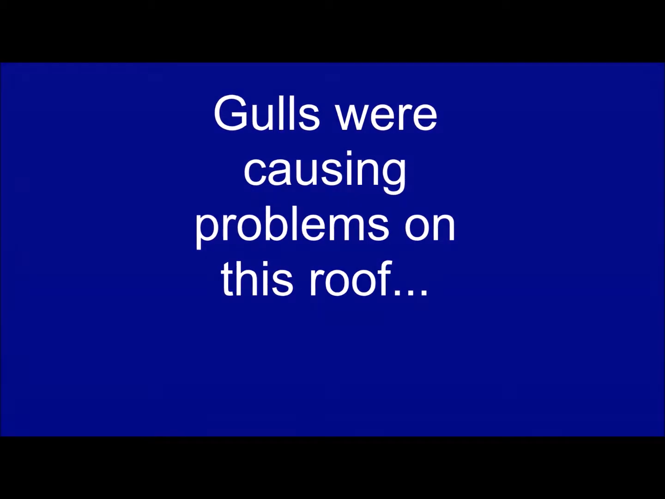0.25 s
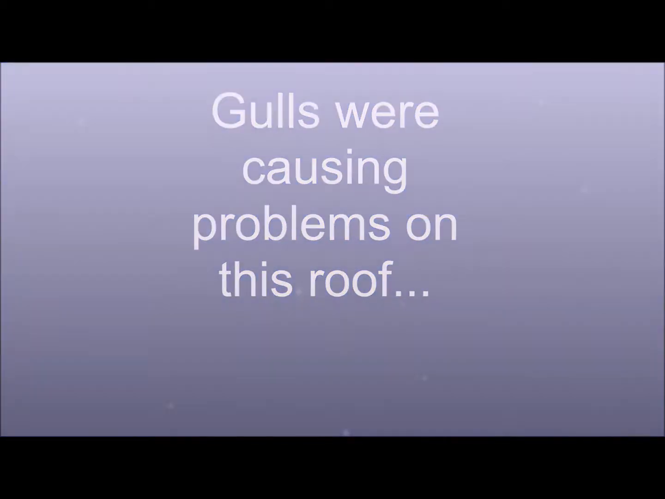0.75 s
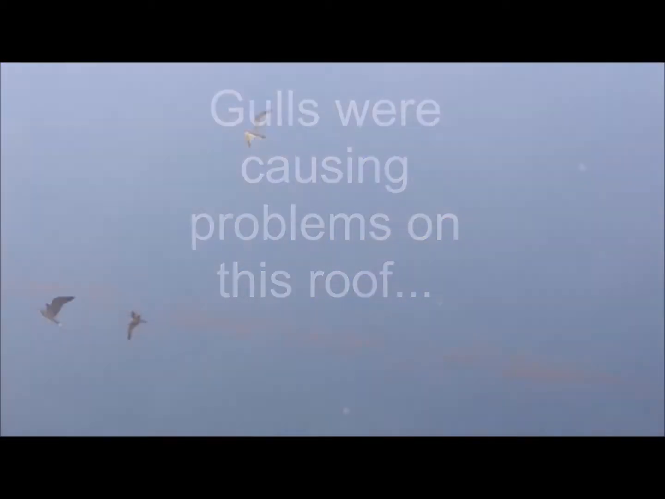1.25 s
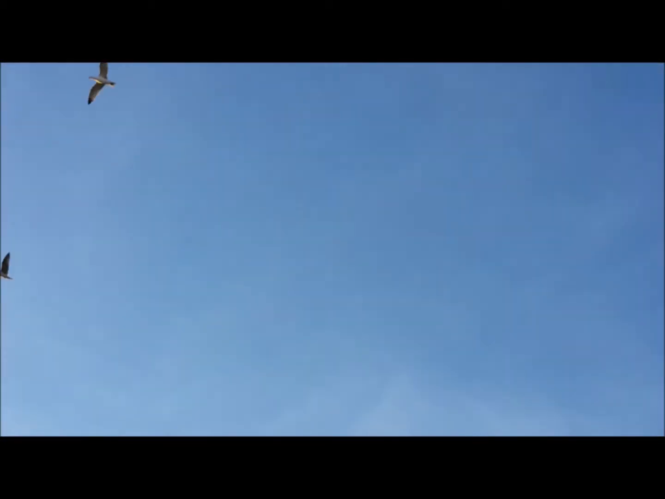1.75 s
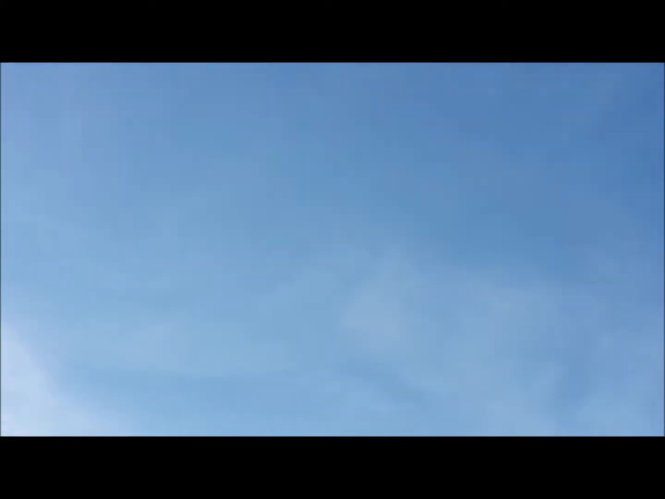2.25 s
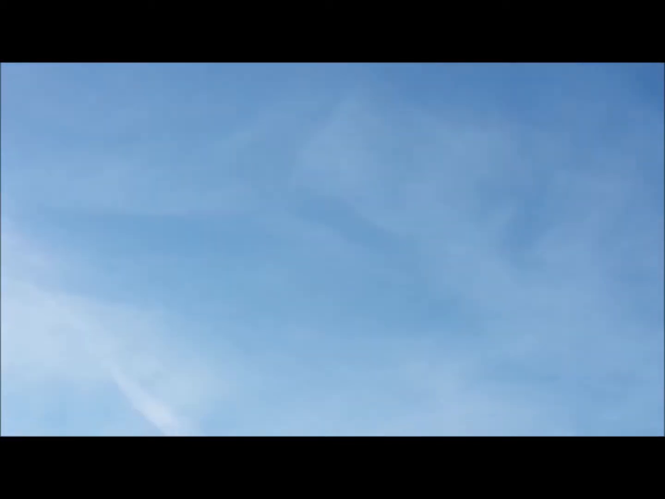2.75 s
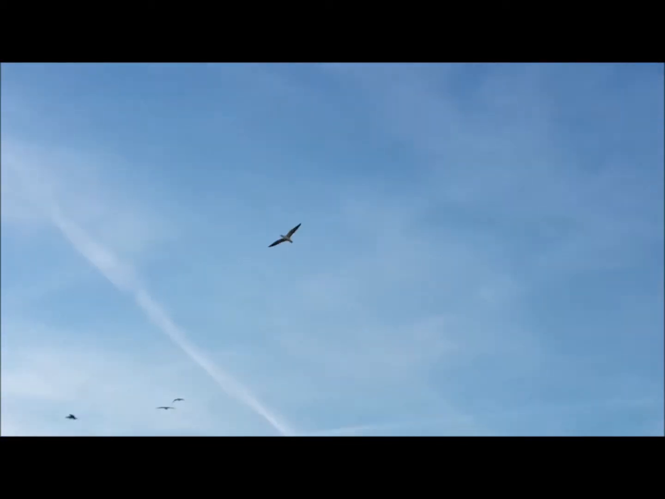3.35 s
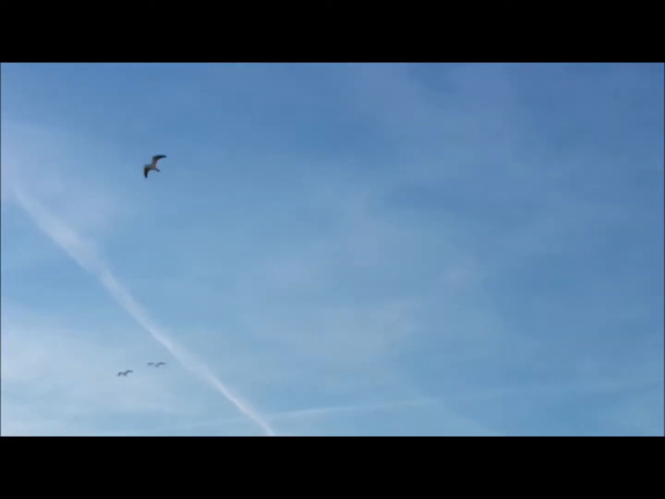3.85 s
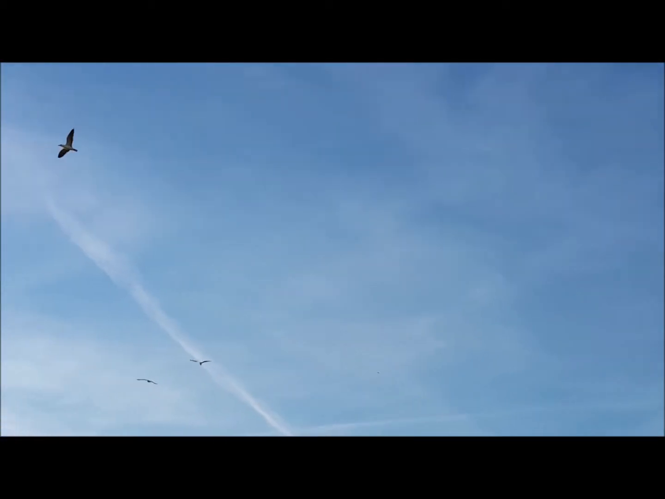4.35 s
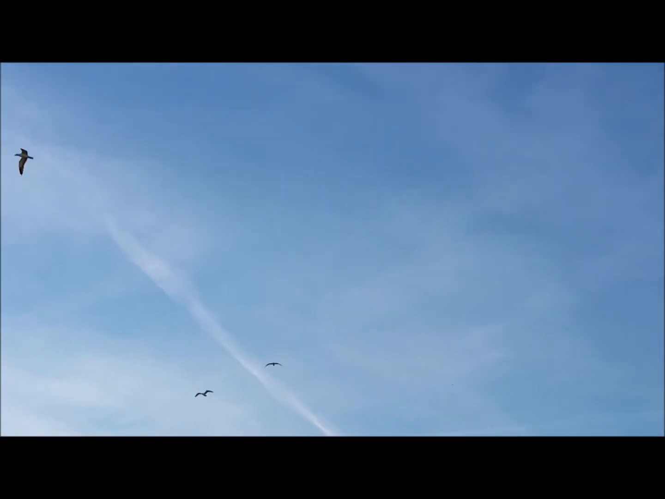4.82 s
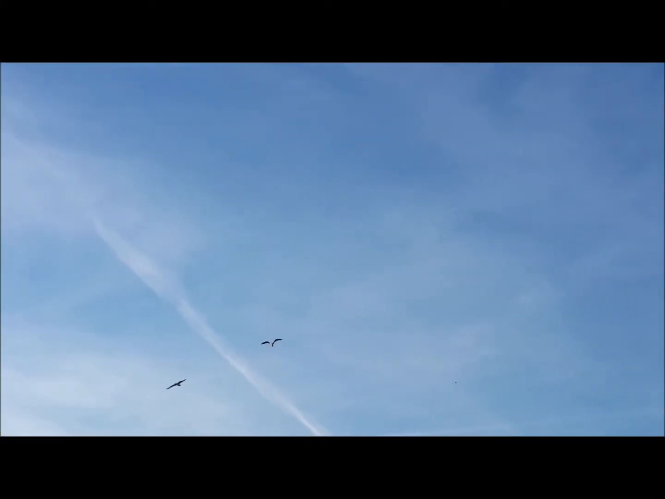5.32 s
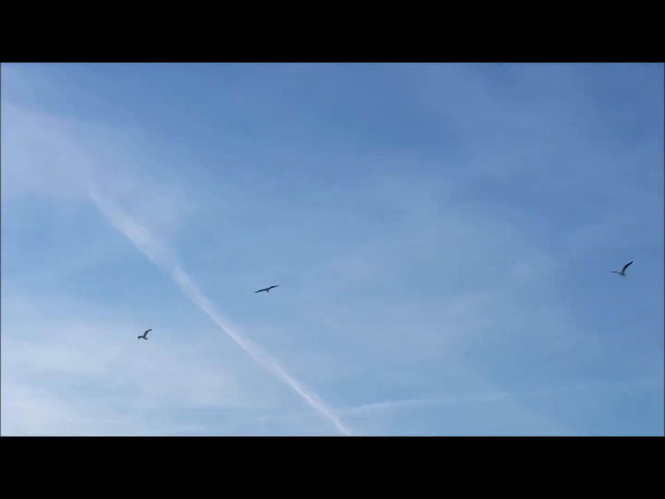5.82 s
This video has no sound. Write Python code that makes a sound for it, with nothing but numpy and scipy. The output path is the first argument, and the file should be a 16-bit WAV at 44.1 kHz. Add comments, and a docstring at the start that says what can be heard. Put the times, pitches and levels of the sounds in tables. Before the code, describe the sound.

Outdoors by a roof, a handheld stereo microphone picks up gulls at mixed distances. Their crowded, faint opening cries grow clearer as the sound fades in; then strong high mews and deep calls alternate and overlap, spaced more widely. Tiny falling whistles come from a small bird. Low wind buffets thud irregularly from just after three seconds, with dull town rumble and distant gull blur underneath.

```python
"""Out of silence a roofscape fades in: gulls cry across each other, high mews and lower long calls.
Each cry is a harmonic stack on a drawn pitch, shaped by a tone-colour curve; mews mostly reach the left first.
A small bird chips in falling whistles, and scattered echoes follow both kinds of bird.
Wind is lumpy low noise plus damped pressure swings at each microphone port.
Below lie town rumble, a drone, a far-off flock as shaped noise, hiss and a brief faint tone."""
import sys
import numpy as np
from scipy import signal
from scipy.fft import rfft, irfft
from scipy.io import wavfile
from scipy.ndimage import uniform_filter1d

SR = 44100
rng = np.random.default_rng(int(sys.argv[2]) if len(sys.argv) > 2 else 0)


def log_audio(samples):
    """Write samples as a 16-bit WAV file to the path given in sys.argv[1]."""
    # one column per channel
    frames = np.atleast_2d(samples).T
    # limit to full scale, then quantise
    limited = np.clip(frames, -1, 1)
    pcm = np.round(limited * 32767).astype(np.int16)
    wavfile.write(sys.argv[1], SR, pcm)


N = 268260

# All levels are ahead of the fade-in. Left-right is left over right in dB; lead is left before right.

# High mews: some break up from a lower lead-in, others start straight on the top note;
# then a hold, a drop to a shelf and a tail.
# Each row: top time, lead-in, hold and tail in seconds, lead-in, top, shelf and end pitch in Hz,
# lead-in, top, shelf and end effort in dB, left-right in dB, left lead in ms, overtones in dB,
# dulling in dB per kHz, odd overtones in dB.
MEWS = [(0.372, 0.0026, 0.02, 0.09, 1696, 1656, 1430, 1377, -49, -36.5, -40.5, -41.5, -2.5, 0.33, 7.5, 5, 0),
        (0.417, 0.0016, 0.058, 0.032, 1670, 1673, 1505, 1427, -48, -44, -37.5, -45, -2, 0.25, 8, 4.5, 2),
        (0.515, 0.0017, 0.037, 0.18, 1496, 1445, 1252, 1126, -49, -34, -42.5, -42, -3.5, 0.33, 0.5, 3.5, 5),
        (0.864, 0.002, 0.003, .003, 1680, 1710, 1590, 1580, -47, -45.5, -56, -63, 2, 0.36, 4.5, 0, -5),
        (0.92, 0.0023, 0.0014, 0.12, 1390, 1370, 1262, 1106, -40, -47, -48, -52.5, -6, -0.35, -1.5, 3, 3),
        (0.674, 0.029, 0.044, 0.16, 1258, 1794, 1552, 1373, -33, -32.5, -30, -40.5, 2, -0.23, -4, 0, 0),
        (1.33, 0.053, 0.022, 0.067, 1340, 1620, 1408, 1340, -40, -36, -42.5, -44.5, -4.5, 0.31, 11.5, 9, -3),
        (1.448, .025, 0.044, 0.15, 1289, 1420, 1253, 1050, -46, -34, -38.5, -49, -3.5, 0.36, 10.5, 7, -0.5),
        (1.47, 0.0015, 0.04, .01, 1400, 1410, 1305, 1280, -55, -58, -52, -49, -5, 0.34, 1.5, 3, 15.5),
        (1.48, 0.0024, 0.021, 0.15, 1738, 1714, 1570, 1497, -52, -52, -35.5, -43, -3, 0.32, -10, 1, 8),
        (1.548, 0.0022, .03, 0.035, 1700, 1710, 1600, 1600, -51, -46, -61, -59, -9, 0.37, 13, 5, -1),
        (1.596, 0.0027, 0.014, 0.022, 1793, 1800, 1673, 1600, -61, -55.5, -56, -60.5, -10, 0.38, 7.5, -0.5, -2.5),
        (1.889, 0.028, 0.045, 0.19, 1229, 1812, 1538, 1330, -31.5, -37, -36, -50, 4.5, 0.14, 10, 3.5, 7),
        (2.468, 0.039, 0.042, 0.14, 1375, 1660, 1430, 1263, -79, -48, -61, -66, -9.5, 0.37, 11, 4.5, 1),
        (2.55, 0.0015, .02, .04, 1640, 1645, 1480, 1400, -59, -61, -67, -71, -6, 0.44, 12, 7, -2),
        (2.511, 0.0024, 0.045, 0.0035, 1663, 1608, 1324, 1350, -64, -49, -40, -45, -2, 0.41, -14, 8, -4),
        (2.779, 0.022, .04, .19, 1310, 1727, 1508, 1304, -25, -35.5, -30.5, -48, -1, 0.241, -0.5, 1.5, 2.5),
        (3.449, 0.049, 0.02, 0.085, 1170, 1410, 1379, 1242, -37, -35.5, -38.5, -41, -7, 0.46, -17.5, 4.5, 7.5),
        (4.204, 0.097, 0.0022, 0.0013, 1494, 1736, 1660, 1720, -43, -45, -55, -67, -1.5, 0.37, -31, 7, -8),
        (4.243, 0.053, 0.0089, 0.016, 1247, 1420, 1412, 1376, -31.5, -33, -41, -43, -7, 0.47, -21, 9.5, -4),
        (4.554, 0.03, 0.017, 0.22, 1353, 1436, 1327, 1202, -60.5, -60, -50.5, -58.5, 0, 0.46, 0, 4.5, 5),
        (4.679, 0.016, 0.0074, 0.048, 1245, 1522, 1452, 1230, -54, -41, -45.5, -45, -6.5, 0.33, -14, 6, 6),
        (5.072, 0.037, 0.034, 0.0023, 1322, 1616, 1622, 1650, -43, -37.5, -32.5, -53, 0, 0.44, -23, -1, -4),
        (5.126, 0.0014, 0.0075, 0.074, 1357, 1372, 1304, 1237, -28, -35.5, -33.5, -52, 1.5, 0.13, -8, 1.5, 2.5),
        (5.236, 0.036, 0.049, 0.18, 1487, 1745, 1519, 1244, -60, -45, -49, -62, -10.5, 0.3, 8.5, 5, 2)]
BREAK_S, DROP_S = .013, .026
LEAD_IN_CLIMB_RATIO, LEAD_IN_SWELL_DB, HOLD_SAG_RATIO = 1.03, 18.5, 0.97
LEAD_IN_OVERTONES_DB = -21  # a sung lead-in is nearly a pure tone
TAIL_KNEE, TAIL_KNEE_LOSS = 0.38, 0.45  # share of the tail's time, share of its fading done by then

# Short yelps: three stuttered notes at the opening, then arched ones that rise and sag.
# Each row: top time, rise and tail in seconds, start, top and end pitch in Hz,
# start, top and end effort in dB, left-right in dB, left lead in ms, overtones in dB,
# dulling in dB per kHz, odd overtones in dB.
YELPS = [(0.283, 0.0091, .002, 1150, 1118, 1030, -38, -37.5, -67, -5, 0.27, -1.5, 0, -4),
         (0.315, 0.0086, .002, 1110, 1115, 1073, -51, -46, -71, 1, 0.4, -4, 3, 10),
         (0.35, 0.0075, .002, 1110, 1110, 1080, -52, -44, -70, -3, 0.33, -4, 7, 10),
         (1.2, .05, 0.2, 1070, 1201, 996, -51.5, -46.5, -66, -1, 0.45, 7, 7.5, -5),
         (2.093, 0.041, 0.066, 1067, 1220, 1040, -50, -50.5, -65, -5, 0.45, 5.5, 3, -2.5),
         (3.105, 0.045, 0.22, 1078, 1213, 956, -52, -46, -62.5, -5, 0.503, 2.5, 6, -4),
         (1.135, 0.059, .002, 1153, 1196, 1080, -60, -59.5, -70, 1, 0.32, -7, 2.5, 8),
         (4.999, .06, 0.04, 1417, 1540, 1276, -52.5, -49.5, -51, 2.5, .42, 4.5, 4.5, 6)]
YELP_SHELF_RATIO, YELP_EARLY_RISE = .9, 0.96  # shelf over top pitch; share of the rise done at half time

# Short upward scoops, some doubling a mew's lead-in. Each row: as the yelps.
SCOOPS = [(5.082, .038, .002, 845, 1130, 1110, -60, -56, -99, .1, .41, 14, 2.1, -8),
          (4.232, .03, .002, 1050, 1330, 1390, -54, -50, -85, -7, .43, 0, 3.5, 0),
          (3.445, .028, .002, 1120, 1220, 1300, -60, -58, -90, -6, .47, 8, 4, -8)]
SCOOP_SHELF_RATIO, SCOOP_EARLY_RISE = 1.1, 0.32

# Low long calls. Each row: top time, rise and tail in seconds, start, top and end pitch in Hz,
# start, top and end effort in dB, share of the rise in the last kick (0-1), left-right in dB,
# left lead in ms, overtones in dB, dulling in dB per kHz, odd overtones in dB.
LONG_CALLS = [(.93, 0.12, 0.15, 613, 640, 560, -54, -40.5, -53, 0.12, 6, .01, 0.5, 5, 7.5),
              (1.85, 0.085, 0.17, 593, 635, 594, -49.5, -42, -54, 0.16, 0.1, 0.097, 0.2, 3, 9.5),
              (2.195, 0.05, 0.041, 545.4, 641, 591, -39.5, -33, -30.5, 0.01, 4, 0.19, 5, 1.5, -1),
              (2.3, .012, 0.041, 574, 563, 518, -32.5, -35, -37, 0.2, 2.5, 0.18, 0, 0.5, 0),
              (2.777, 0.095, 0.11, 602.6, 641, 583, -44.5, -34.5, -38.5, 0.65, 5, 0.16, 1, 2.5, 0),
              (3.575, 0.098, 0.088, 601, 649.5, 579.5, -49, -37.5, -44, 0.6, 9.5, 0.15, 0, 1.7, 4),
              (3.575, 0.028, 0.094, 703, 736, 551, -51, -42, -51, 0, -2.5, 0.091, 14, 5.5, 0),
              (4.38, 0.15, 0.16, 581, 619.7, 561, -56, -36, -36, 0.4, 4.5, 0.17, -0.5, 2.5, -1.5),
              (5.215, 0.038, 0.12, 579, 626, 551, -48, -37.5, -43, 0.5, 6, 0.18, 5, 3, 1.5),
              (5.971, 0.065, 0.0018, 568, 595, 577, -44, -39, -42, 0.14, 2, 0.36, -1.5, 2, -7),
              (6.04, .015, .002, 585, 592, 563, -44, -41.5, -43, 0, 1.5, 0.32, -1.5, 1.5, -4)]
# Hoarse low calls, and raspy onsets of some long calls. Each row: as the long calls.
HOARSE_CALLS = [(.655, 0.034, .002, 549, 649, 640, -59, -56, -65, 0.22, -4, 0.35, 25, 4, 0),
                (.74, 0.04, 0.045, 625, 656, 615, -64, -54, -58.5, 0.2, -2.5, 0.32, 19.5, -0.4, 0.1),
                (1.463, .03, .002, 550, 640, 620, -58, -54, -70, .4, -2.5, .38, 24, 5, 0),
                (1.56, .085, 0.08, 560, 590, 545, -58, -55.5, -63, 0.1, -2.5, 0.388, 28, 4.5, 0.8),
                (2.7, 0.016, .002, 583.6, 596, 585, -51, -51.5, -63, 0, 2, 0.097, 10, 1.5, 3.5),
                (3.489, .015, .002, 584, 597, 590, -53, -54.5, -66, 0.2, 6, 0.16, 9, 3, 3),
                (5.2, 0.094, 0.039, 558, 596, 570, -55, -57, -62, 0.08, 2, 0.23, 11.5, 1, -2)]
LONG_SHELF_RATIO, LONG_EARLY_RISE = 0.95, .82
FALL_S, KICK_S = 0.037, 0.026  # top to shelf; longest last kick up to the top note
NEAR_DB = -35.5  # effort above which a long call counts as near

# Tone colour of high and low voices, throat and microphone together.
# Each row: frequency in Hz, level in dB.
HIGH_COLOUR = [(1000, 4), (1600, -1.64), (2400, -3.5), (3000, -1.5), (3600, 2.5), (4500, -12.5),
               (5200, -12), (6200, -14.5), (6900, -30.5), (7500, -26), (9000, -79)]
LOW_COLOUR = [(600, -15.5), (1200, -4), (1800, -13.5), (2400, -12.5), (3000, -11.5), (3600, -4.5),
              (4200, -13), (5000, -16.5), (5600, -22), (6200, -33.5), (6700, -49.5), (7600, -25.5),
              (8600, -37.5), (9500, -52.5), (11400, -31.5), (13000, -56)]
# Roughness scales the waver; a long call starts raspy and clears as it climbs.
HIGH_ROUGH, LOW_ROUGH, HOARSE_ROUGH = .09, .12, .5
START_ROUGH, CLIMB_ROUGH = .6, .22

# Small bird. Each row: start and length in seconds, start and end pitch in Hz, level in dB,
# left lead in ms, octave against fundamental in dB.
CHIPS = [(3.017, .012, 3430, 2200, -55, 0.49, 1), (3.146, 0.032, 3810, 2430, -47.5, 0.42, -7),
         (3.996, 0.032, 3940, 2420, -53.5, 0.36, -11.5), (4.09, 0.028, 3750, 2660, -54, 0.4, -23),
         (5.105, 0.027, 3180, 2300, -58, 0.32, -2), (5.189, .025, 3280, 2400, -54, 0.34, -7),
         (5.28, 0.028, 3390, 2360, -55, 0.3, 2), (2.397, 0.012, 3040, 2290, -56, 0.33, -7)]
CHIP_GRAIN_DB = 5

# Housing around the ports. Each row: frequency in Hz, left-right in dB.
SHADOW = [(800, -3.5), (1300, 0), (2000, 0.5), (2800, -2), (4000, -2), (6000, -5), (9000, 7.5)]
ECHO_T60_S, ECHO_CUT_HZ, ECHO_DB = 0.37, 9600, -17

# Wind thumps. Each row: start in seconds, drive of the swing in dB, left-right in dB,
# pop against the swing's drive in dB.
THUMPS = [(1.136, -32, -35, -9), (2.935, -45, 9, -8), (3.26, -33, -24, -29), (3.407, -31, 28, -18),
          (3.482, -18, 8, -26), (3.578, -27, 40, -32), (3.633, -19.5, 15.5, -30),
          (3.802, -15.5, -21.5, -26), (3.883, -28, -4, -27), (3.914, -14.5, -19, -29),
          (4.062, -21, -19, -17), (4.229, -23, 17.5, -11.5), (4.298, -30, 18, -21), (4.345, -22, 5, -18),
          (4.398, -22.5, -18.5, -9), (4.467, -25.5, -17, -26), (4.644, -48, -6, -17.5),
          (4.829, -21.5, 4, -24), (4.912, -17.5, -18.5, -27), (4.952, -22.5, 35.5, -28),
          (5.572, -17, 13.5, -24), (5.975, -22.5, 24, -2.5)]
# Air churns around every thump: spread in time, level against it, share of its left-right difference.
GUST_S, GUST_DB, GUST_SIDE = 0.11, -11.5, 0.4

# Slow swell of the wind, ahead of the gusts. Each row: time in seconds, level in dB, left-right in dB.
WIND_SWELL = [(.26, -42.5, -2), (.96, -32.5, 0.5), (1.5, -40.5, -2), (1.67, -35.5, 2), (2.2, -40, -1.5),
              (2.5, -35, -0.5), (2.84, -28.5, 5.5), (3.1, -37, -4), (3.27, -26, -2.5), (3.36, -38, -4),
              (3.6, -29, 7.5), (4.02, -29.5, -5.5), (4.36, -21.5, -1), (4.5, -34.5, -1), (4.78, -38, -5),
              (4.9, -28.5, 1), (5.4, -35, -0.5), (5.6, -31.5, 0.5), (6.08, -29, 1)]
# Noise spectra. Each row: frequency in Hz, relative density in dB per Hz.
WIND_TONE = [(40, -48.5), (65, 1.5), (100, 1.5), (140, -1), (200, -8), (300, -18), (430, -27.5),
             (700, -36.5), (1200, -83.5)]
RUMBLE_TONE = [(22, -22.5), (33, 12.5), (40, 14.5), (46, 33.5), (53, 27.5), (62, 9), (90, -51.5)]
FAR_TONE = [(250, 8), (430, -2), (830, -2.5), (950, -0.5), (1280, -4.5), (1720, -12), (2200, -21),
            (3120, -23), (4190, -19.5), (4900, -29.5), (5790, -48), (7000, -46), (8500, -85.5)]
HISS_TONE = [(6000, -11), (8700, -18.5), (10500, -2), (13000, 0), (15000, 3), (15700, 2.5)]

# Common swell of rumble and drone, ahead of their trims. Each row: time in seconds, level in dB.
RUMBLE_SWELL = [(.26, -45), (.89, -32), (1.2, -46), (1.55, -41.5), (1.91, -34.5), (2.85, -39.5),
                (3.01, -35), (3.6, -46), (4.1, -45.5), (4.33, -43.5), (5.35, -38.5), (5.65, -33.5),
                (6.08, -28.5)]
RUMBLE_TRIM_DB, DRONE_TRIM_DB, DRONE_HZ = -3.5, 3.5, 45.15

# Far flock, hiss, faint steady tone. Each row: time in seconds, level in dB.
FLOCK = [(.26, -52.5), (.8, -51.5), (1.2, -59.5), (1.75, -53), (2.55, -55), (3.3, -58), (3.9, -60.5),
         (4.85, -58.5), (5.6, -59.5), (6.08, -58)]
HISS = [(.26, -80), (2.25, -76.5), (2.6, -72.5), (3.3, -71.5), (3.6, -72), (6.08, -72)]
WHINE = [(1.7, -62), (2.3, -51.5), (3.0, -60.5), (3.7, -50), (4.1, -66.5), (4.4, -77.5)]
WHINE_HZ = 1250
TOWN_DB, FLICKER_DB = -46.5, 1.2
SCATTER_DB, SCATTER_S = -27, 0.24  # near cries return as a blur: level under them, smear

FADE_START_S, FADE_S = 0.25, 2.054
OVERLOAD_PEAK, CUTOFF_HZ = .62, 15750


def gulls():
    """Every cry at its own arrival difference; near long calls keep more high harmonics."""
    out = np.zeros((2, N))
    for row in MEWS:
        sing(out, mew(*row[:-5]), row[-5:], HIGH_COLOUR, HIGH_ROUGH, 5, lead_in=row[1] > BREAK_S)
    for row in YELPS:
        rows = arch(YELP_SHELF_RATIO, YELP_EARLY_RISE, *row[:-5])
        sing(out, rows, row[-5:], HIGH_COLOUR, HIGH_ROUGH, 4)
    for row in SCOOPS:
        rows = arch(SCOOP_SHELF_RATIO, SCOOP_EARLY_RISE, *row[:-5])
        sing(out, rows, row[-5:], HIGH_COLOUR, HIGH_ROUGH, 4)
    for row in LONG_CALLS:
        rows = arch(LONG_SHELF_RATIO, LONG_EARLY_RISE, *row[:-5])
        rough = [START_ROUGH, CLIMB_ROUGH] + [LOW_ROUGH] * 4
        count = 21 if max(row[6:9]) > NEAR_DB else 14
        sing(out, rows, row[-5:], LOW_COLOUR, rough, count)
    for row in HOARSE_CALLS:
        rows = arch(LONG_SHELF_RATIO, LONG_EARLY_RISE, *row[:-5])
        sing(out, rows, row[-5:], LOW_COLOUR, HOARSE_ROUGH, 10)
    return out


def sing(out, rows, setting, colour, rough, count, lead_in=False):
    """Voices one pitch-and-effort curve with count harmonics and places it."""
    pan_db, lead_ms, overtones_db, dulling_db, odd_db = setting
    overtones_db = np.full(len(rows), float(overtones_db))
    if lead_in:
        overtones_db[:2] = LEAD_IN_OVERTONES_DB
    harmonics_db = voice(rows, colour, overtones_db, dulling_db, odd_db, count)
    tone, start_s = cry(rows, rough, harmonics_db)
    add(out, tone, start_s, lead_ms, pan_db)


def mew(s, lead_s, hold_s, tail_s, lead_hz, top_hz, shelf_hz, end_hz,
        lead_db, top_db, shelf_db, end_db):
    """Pitch and effort of a mew as points of (s, Hz, dB)."""
    lead_s = max(lead_s, .002)
    shelf_s = s + hold_s + DROP_S
    knee_hz = shelf_hz + TAIL_KNEE * (end_hz - shelf_hz)
    knee_db = shelf_db + TAIL_KNEE_LOSS * (end_db - shelf_db)
    return [(s - lead_s, lead_hz, lead_db - LEAD_IN_SWELL_DB),
            (s - min(BREAK_S, lead_s / 2), min(lead_hz * LEAD_IN_CLIMB_RATIO, top_hz), lead_db),
            (s, top_hz, top_db),
            (s + hold_s, top_hz * HOLD_SAG_RATIO, top_db),
            (shelf_s, shelf_hz, shelf_db),
            (shelf_s + TAIL_KNEE * tail_s, knee_hz, knee_db),
            (shelf_s + tail_s, end_hz, end_db)]


def arch(shelf_ratio, early_rise, s, rise_s, tail_s, start_hz, top_hz, end_hz,
         start_db, top_db, end_db, kick=0):
    """Pitch and effort through start, top, shelf and end as (s, Hz, dB); kick is the share of rise kept last."""
    after_s = FALL_S + tail_s
    plateau_hz = top_hz - kick * (top_hz - start_hz)
    half_hz = start_hz + early_rise * (plateau_hz - start_hz)
    kick_s = min(KICK_S, rise_s / 4)
    kick_hz = plateau_hz - (plateau_hz - half_hz) * 2 * kick_s / rise_s
    shelf_db = top_db + (end_db - top_db) * FALL_S / after_s
    return [(s - rise_s, start_hz, start_db),
            (s - rise_s / 2, half_hz, top_db),
            (s - kick_s, kick_hz, top_db),
            (s, top_hz, top_db),
            (s + FALL_S, shelf_ratio * top_hz, shelf_db),
            (s + after_s, end_hz, end_db)]


def voice(rows, colour, overtones_db, dulling_db, odd_db, count):
    """Harmonic levels along a cry: fixed tone colour, overtone strength, odd balance, distance dulling."""
    colour_hz, colour_db = np.transpose(colour)
    order = np.arange(1, count + 1)[:, None]
    hz = order * np.transpose(rows)[1]
    coloured_db = np.interp(np.log(hz), np.log(colour_hz), colour_db)
    overtones = (overtones_db + odd_db * (order % 2)) * (order > 1)
    return coloured_db + overtones - dulling_db * (hz - hz[0]) / 1000


def cry(rows, rough, harmonics_db, edge_s=.012, release_s=0.023, dulling=0.14, break_db=.45):
    """Syrinx tone as a harmonic stack; a rough voice wavers in pitch and strength."""
    s, hz, level_db = np.transpose(rows)
    t = np.arange(s[0] - edge_s, s[-1] + release_s, 1 / SR)
    count = len(t)
    rough = np.interp(t, s, np.broadcast_to(rough, s.shape))
    waver = .04 * rough * drift(70, count)
    pitch_hz = uniform_filter1d(np.interp(t, s, hz), size=400)
    phase = 2 * np.pi * np.cumsum(pitch_hz * (1 + waver)) / SR
    # the voice thins out while it breaks upward: break_db per octave a second beyond 3
    rising = np.maximum(np.gradient(np.log2(pitch_hz)) * SR - 3, 0)
    effort_db = np.interp(t, s, level_db) - break_db * rising
    tone = 0
    for k, db in enumerate(harmonics_db):
        # each harmonic fades in and out as the bird turns and the ground echo shifts
        shared_db = 2.4 * drift(14, count) + 8 * rough * drift(50, count)
        flutter = rms_one(amp([shared_db + 1.5 * drift(14, count) for port in range(2)]))
        # turbulent air blurs the phase, more so for high harmonics
        blur = .022 * (k + 1) * drift(60, count)
        # a softer effort loses its upper harmonics first
        dull = amp(dulling * np.log2(k + 1) * (effort_db - level_db.max()))
        wave = np.sin((k + 1) * phase + blur + rng.uniform(0, 2 * np.pi))
        tone = tone + amp(np.interp(t, s, db)) * dull * flutter * wave
    edges = np.clip(np.minimum((t - t[0]) / edge_s, (t[-1] - t) / release_s), 0, 1) ** 2
    return np.sqrt(2) * tone * amp(effort_db) * edges, t[0]


def small_bird(pan_db=-5, treble_cut_hz=5500, waver_rad=.45):
    """A steep falling, grainy whistle with an octave, its treble rolled off."""
    out = np.zeros((2, N))
    for s, length_s, start_hz, end_hz, db, lead_ms, octave_db in CHIPS:
        count = round(length_s * SR)
        pitch_hz = np.geomspace(start_hz, end_hz, count)
        phase = 2 * np.pi * np.cumsum(pitch_hz) / SR + waver_rad * drift(300, count)
        level = amp(db + CHIP_GRAIN_DB * drift(150, count)) * np.sqrt(np.hanning(count))
        whistle = np.sin(phase) + amp(octave_db) * np.sin(2 * phase)
        add(out, level * whistle, s, lead_ms, pan_db)
    return signal.sosfilt(signal.butter(9, treble_cut_hz, fs=SR, output="sos"), out)


def shadowed(x):
    """The housing colours the two ports differently."""
    hz = np.maximum(np.fft.rfftfreq(N, 1 / SR), 1)
    shadow_hz, tilt_db = np.transpose(SHADOW)
    tilt_db = np.interp(np.log(hz), np.log(shadow_hz), tilt_db)
    return irfft(rfft(x) * amp(tilt_db / 2 * [[1], [-1]]), N)


def echoes(x):
    """Roofs and walls scatter back a dull, dying noise tail, another one in each channel."""
    t = np.arange(round(ECHO_T60_S * SR)) / SR
    tail = rng.standard_normal((2, len(t))) * amp(-60 * t / ECHO_T60_S) * (t > .012)
    tail = signal.sosfilt(signal.butter(2, ECHO_CUT_HZ, fs=SR, output="sos"), tail)
    tail = tail / np.sqrt(np.sum(tail ** 2, axis=1, keepdims=True))
    return amp(ECHO_DB) * signal.fftconvolve(x, tail, axes=1)[:, :N]


def thumps(hz=130, cycles=0.85, sharp_hz=500, pop_hz=1100, pop_cut_hz=3500):
    """A gust hits a port as one damped pressure swing with a pop half a cycle in."""
    swings, pops = np.zeros((2, 2, N))
    for s, db, pan_db, pop_db in THUMPS:
        drive = amp(db + np.array([1, -1]) * pan_db / 2)
        swings[:, round(s * SR)] = drive
        pops[:, round((s + .5 / hz) * SR)] = drive * amp(pop_db)
    t = np.arange(round(0.11 * SR)) / SR
    swing = np.sin(2 * np.pi * hz * t) * np.exp(-t * hz / cycles)
    swing = signal.sosfilt(signal.butter(2, sharp_hz, fs=SR, output="sos"), swing)
    pop = t * pop_hz * np.exp(1 - t * pop_hz * np.e) * np.e
    pop = signal.sosfilt(signal.butter(4, pop_cut_hz, fs=SR, output="sos"), pop)
    swung = signal.fftconvolve(swings, [swing], axes=1)
    return (swung - signal.fftconvolve(pops, [pop], axes=1))[:, :N]


def wind(lumpy_db=5.0, lump_hz=29.6):
    """Eddies break over each port: low noise, nearly separate per port, in uneven lumps."""
    lumps = np.array([amp(2 * lumpy_db * np.tanh(drift(lump_hz) / 2)) for port in range(2)])
    return coloured(pair(.12) * lumps, WIND_TONE) * churning()


def churning():
    """Strength of the wind at each port: its slow swell, and a short gust around every thump."""
    sign = np.array([[1], [-1]])
    level_db, pan_db = in_time(WIND_SWELL)
    power = amp(level_db + pan_db / 2 * sign) ** 2
    t = np.arange(N) / SR
    for s, db, side_db, _ in THUMPS:
        near = slice(round((s - 3 * GUST_S) * SR), round((s + 3 * GUST_S) * SR))
        peak = amp(db + GUST_DB + GUST_SIDE * side_db / 2 * sign)
        power[:, near] += (peak * np.exp(-((t[near] - s) / GUST_S) ** 2)) ** 2
    return np.sqrt(power)


def town_rumble():
    """Low shaped noise and a deep drone of drifting pitch from the town, swelling together."""
    pitch_hz = DRONE_HZ * (1 + 0.0731 * drift(1.48))
    drone = amp(DRONE_TRIM_DB) * np.sin(2 * np.pi * np.cumsum(pitch_hz) / SR)
    rumble = amp(RUMBLE_TRIM_DB) * coloured(pair(0.42), RUMBLE_TONE)
    return (rumble + drone) * amp(in_time(RUMBLE_SWELL)[0])


def background(birds, split_hz=2000):
    """Town noise below, blur of far flock and scattered cries above, preamp hiss, one faint tone."""
    far = coloured(pair(1.0, apart_hz=890), FAR_TONE)
    low = signal.sosfiltfilt(signal.butter(2, split_hz, fs=SR, output="sos"), far)
    town = rms_one(low) * amp(TOWN_DB + 1.1 * drift(2.5))
    cries_power = uniform_filter1d(np.mean(birds ** 2, axis=0), round(SCATTER_S * SR))
    scatter_power = amp(SCATTER_DB) ** 2 * np.maximum(cries_power, 0)
    blur = np.sqrt(amp(in_time(FLOCK)[0]) ** 2 + scatter_power)
    flock = rms_one(far - low) * blur * amp(FLICKER_DB * drift(14))
    hiss = coloured(pair(0), HISS_TONE) * amp(in_time(HISS)[0])
    t = np.arange(N) / SR
    sounding = (t > WHINE[0][0]) * (t < WHINE[-1][0])
    whine = amp(in_time(WHINE)[0]) * np.sin(2 * np.pi * WHINE_HZ * t) * sounding
    return town + flock + hiss + whine


def amp(db):
    """dB to gain."""
    return 10 ** (np.asarray(db, float) / 20)


def rms_one(x):
    """Scales to rms 1 over all rows together."""
    return x / np.sqrt(np.mean(x ** 2) + 1e-20)


def in_time(rows):
    """Each column of a curve, sample by sample."""
    s, *columns = np.transpose(rows)
    return [np.interp(np.arange(N) / SR, s, column) for column in columns]


def drift(rate_hz, count=N):
    """Slow chance: white noise twice through a one-pole low-pass, run in; rms 1."""
    r = np.exp(-2 * np.pi * rate_hz / SR)
    noise = rng.standard_normal(count + 4000)
    return rms_one(signal.lfilter([1], [1, -2 * r, r * r], noise)[4000:])


def coloured(x, tone):
    """Shapes each row of x by a spectrum; rms 1."""
    hz = np.maximum(np.fft.rfftfreq(N, 1 / SR), 1)
    tone_hz, tone_db = np.transpose(tone)
    gain = amp(np.interp(np.log(hz), np.log(tone_hz), tone_db)) * (hz > tone_hz[0] / 2)
    return rms_one(irfft(rfft(x) * gain, N))


def pair(alike, apart_hz=SR / 4):
    """Two noises that share a part in the bass, and ever less above apart_hz."""
    mid, side = rng.standard_normal((2, N))
    alike = np.clip(alike, 0, .95)
    low_mid, low_side = signal.lfilter(*signal.butter(1, apart_hz, fs=SR), [mid, side])
    mid = mid + (np.sqrt(1 + alike) - 1) * low_mid
    side = side + (np.sqrt(1 - alike) - 1) * low_side
    return mid + side * [[1], [-1]]


def add(out, sound, s, lead_ms, pan_db):
    """Places a sound at both ports; a positive lead reaches the left before the right."""
    count = np.shape(sound)[-1]
    sign = np.array([[1], [-1]])
    at = round(s * SR) + np.arange(count)
    turn = np.exp(sign * 1j * np.pi * np.fft.rfftfreq(count) * lead_ms * SR / 1000)
    placed = np.fft.irfft(np.fft.rfft(sound) * turn, count) * amp(sign * pan_db / 2)
    out[:, at[at < N]] += placed[:, at < N]


def scene():
    """Birds with their echoes, over wind, town and background."""
    birds = shadowed(gulls() + small_bird())
    return birds + echoes(birds) + thumps() + wind() + town_rumble() + background(birds)


def record(dry):
    """Loud peaks are rounded off; a straight fade-in from silence; the top is cut."""
    fade = np.clip((np.arange(N) / SR - FADE_START_S) / FADE_S, 0, 1)
    rounded = OVERLOAD_PEAK * np.tanh(dry / OVERLOAD_PEAK)
    top_cut = signal.ellip(12, .5, 70, CUTOFF_HZ, fs=SR, output="sos")
    return signal.sosfilt(top_cut, rounded * fade)


dry = scene()
out = record(dry)
log_audio(out)
```